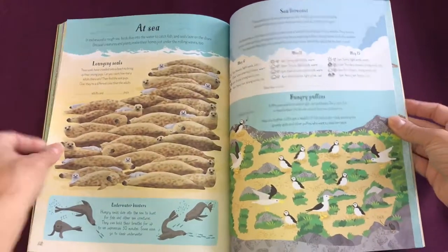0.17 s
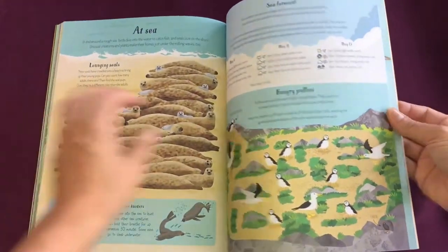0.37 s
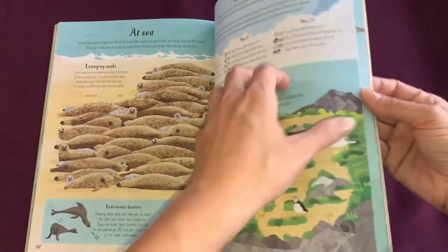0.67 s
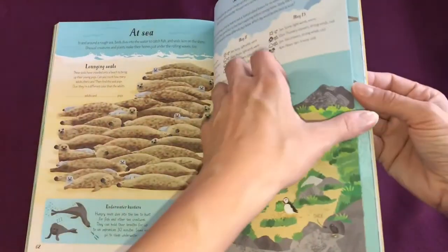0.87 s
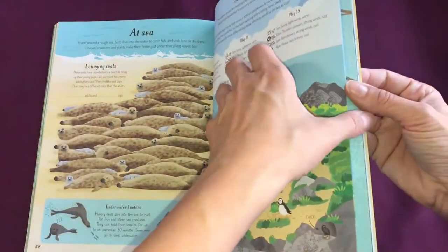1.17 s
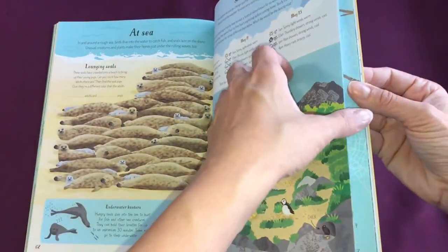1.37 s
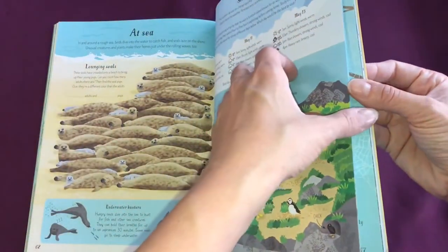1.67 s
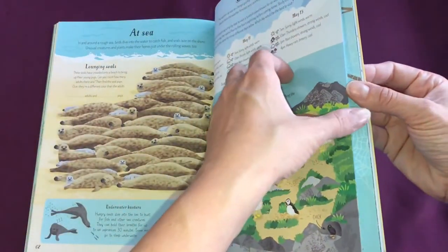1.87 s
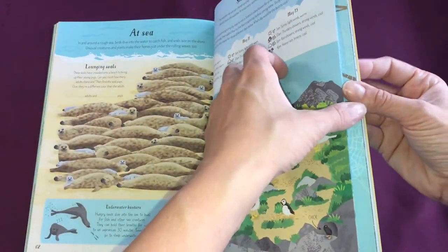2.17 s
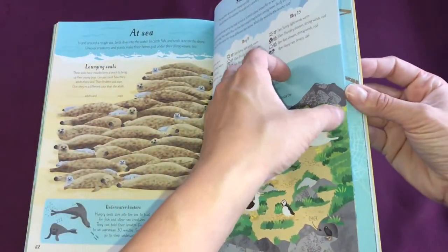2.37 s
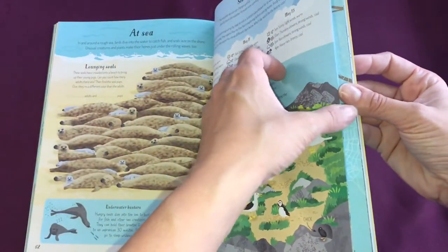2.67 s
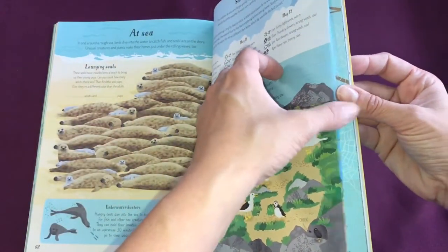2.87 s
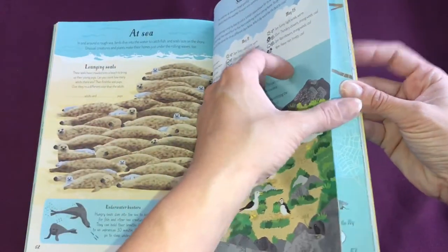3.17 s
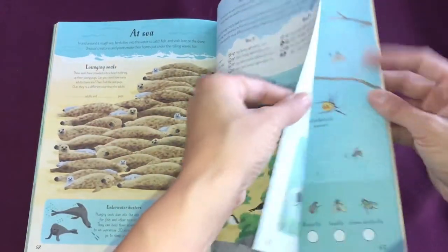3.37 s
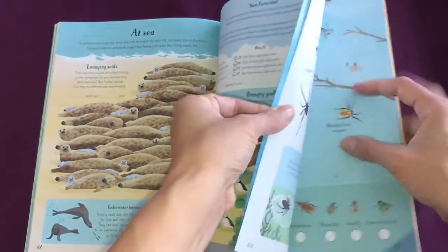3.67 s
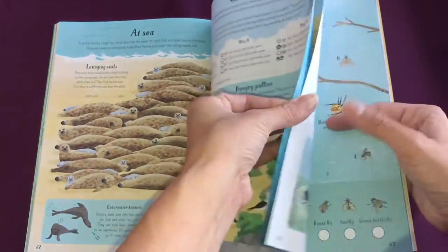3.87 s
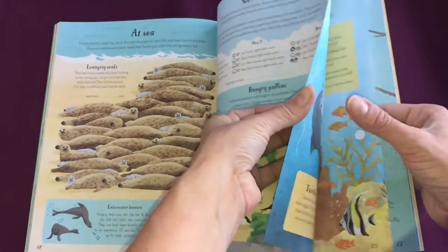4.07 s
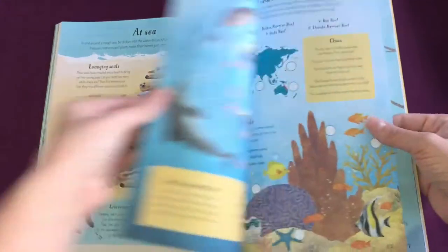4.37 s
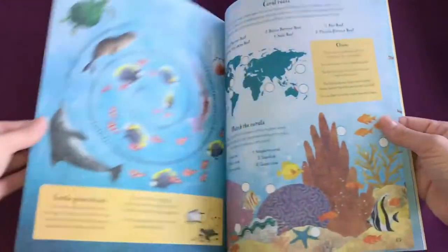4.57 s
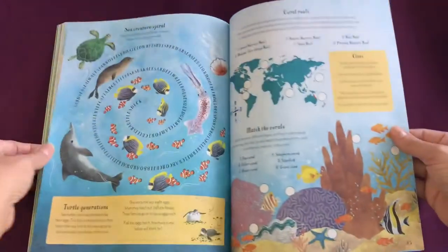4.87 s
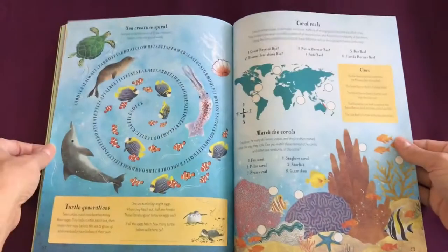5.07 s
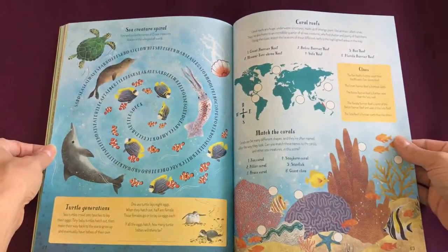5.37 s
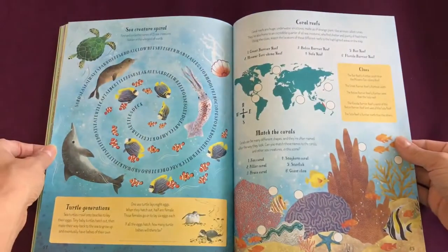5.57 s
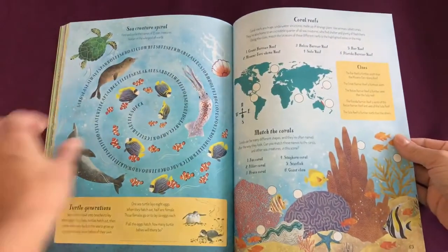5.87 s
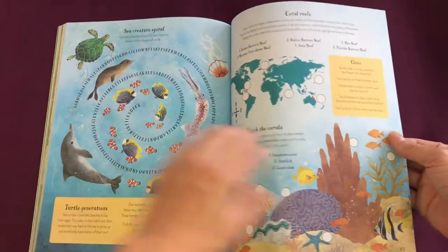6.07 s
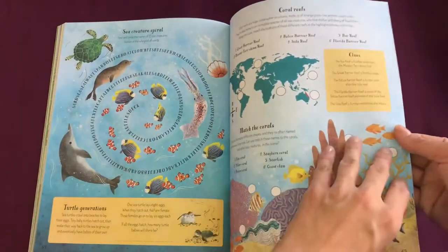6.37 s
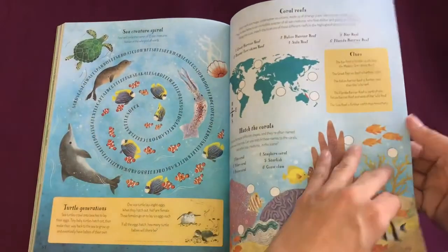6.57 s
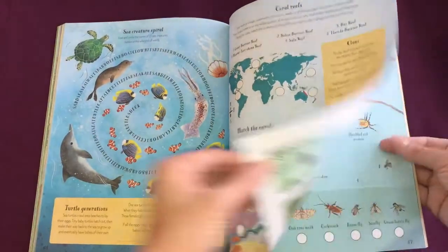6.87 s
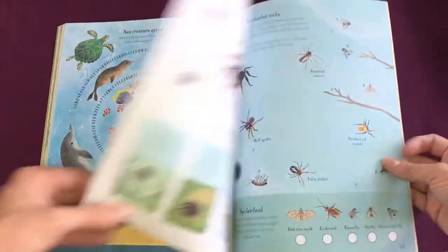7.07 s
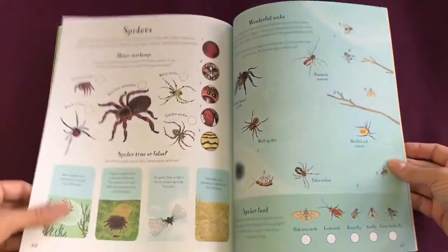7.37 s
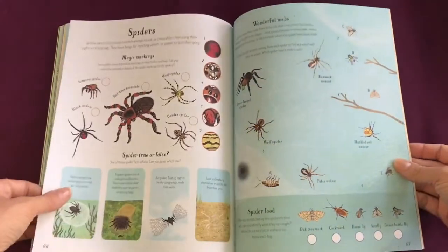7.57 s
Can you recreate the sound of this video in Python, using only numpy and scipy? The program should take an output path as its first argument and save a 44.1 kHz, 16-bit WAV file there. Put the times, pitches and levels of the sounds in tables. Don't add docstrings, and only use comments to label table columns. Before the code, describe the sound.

A close, mostly dry indoor sound of a glossy book being handled, over a steady faint low hum of household appliances, soft air noise and barely audible thin treble ticks about ten times a second. In the first 0.7 seconds, a small flick and light finger rubs and rustles. Near-silence follows, with tiny ticks around 1.2 and a snap at 1.8. Sharp edge snaps and a quick rub come at 2.2-2.4, softer rubbing at 2.6-2.9. From 3.2 to 4.9 the busiest passage: rustling, sliding sheets, hollow low pops, bright cracks and brief breathy squeaks of squeezed air as pages turn, then fading. Quiet around 5-5.8, with small ticks and a faint distant thud at 5.6. From 5.8 light rustles grow into a second, gentler turn at 6.6-7.5, with snaps near 6.9, a dull flap at 7.2, then tiny final rubs.

```python
import sys
import numpy as np
from scipy import signal
from scipy.fft import rfft, irfft
from scipy.io import wavfile

SR = 44100
rng = np.random.default_rng(int(sys.argv[2]) if len(sys.argv) > 2 else 0)


def elevation(decibels):
    levels = np.asarray(decibels, float)
    return 10 ** (levels / 20)


def materialize(psi):
    bounded = np.clip(np.atleast_2d(psi).T, -1, 1)
    quanta = np.round(bounded * 32767).astype(np.int16)
    wavfile.write(sys.argv[1], SR, quanta)


N = 340893


def rms_one(x):
    return x / np.sqrt(np.mean(x ** 2) + 1e-20)


def colour(x, points):
    hz, level_db = np.transpose(points)
    grid = rfft(np.zeros(N)).size
    at = np.log(np.linspace(1, SR / 2, grid))
    gain_db = np.interp(at, np.log(hz), level_db, left=-90)
    return irfft(rfft(x) * elevation(gain_db), N)


def band(x, low_hz, high_hz):
    edges = [low_hz, min(high_hz, 0.45 * SR)]
    return signal.sosfilt(signal.butter(4, edges, "band", fs=SR, output="sos"), x)


def resonance(x, hz, width_hz):
    r = np.exp(-np.pi * width_hz / SR)
    ring = [1, -2 * r * np.cos(2 * np.pi * hz / SR), r * r]
    return signal.lfilter([(1 - r * r) / 2, 0, (r * r - 1) / 2], ring, x)


def drift(rate):
    r = np.exp(-80 * np.pi * rate / SR)
    noise = rng.standard_normal(N // 40 + 2002)
    slow = signal.lfilter([1], [1, -2 * r, r * r], noise)[2000:]
    return np.interp(np.arange(N) / 40, np.arange(len(slow)), rms_one(slow - slow.mean()))


def sliding():
    # (f/Hz, level/dB)
    sheet_colour = [(250, -18), (400, 5), (800, 3.5), (1600, 0), (2300, -1), (2800, -4), (4200, -4.5),
                    (5000, -8), (7000, -6.5), (10000, -10), (10600, -16.5), (12500, -14.5), (15800, -18)]
    grain_size = elevation(2.4 * np.minimum(rng.exponential(1, N), 5))
    grain_here = rng.random(N) < 2500 / SR
    grains = grain_size * grain_here * rng.choice([-1, 1], N)
    sheet = colour(rng.standard_normal(N) + 0.77 * rms_one(grains), sheet_colour)
    ranges_hz = [(2450, 4850), (350, 2200), (5000, 10300), (10600, 17500)]
    pressure = elevation(1.33 * drift(32.0) - 3.0)
    out = np.zeros(N)
    for gain, (low_hz, high_hz) in zip(strokes(), ranges_hz):
        out += gain * pressure * rms_one(band(sheet, low_hz, high_hz))
    return out


def strokes():
    # (start/s, end/s, level/dB, pressure change/dB, brightness/dB)
    rubs = [(.25, .254, -63, 0, 0), (.265, 0.267, -64, 0, 0), (0.28, 0.282, -62, 0, 0),
            (0.296, .3, -61, -2, 0), (0.309, 0.313, -60, 0, 5), (0.317, 0.332, -53, -10, 10),
            (.35, .455, -61, -6.5, 6), (1.15, 1.23, -75, 7, 13), (1.229, 1.29, -60.5, 11, 4.5),
            (2.196, 2.28, -63, -27, -2), (2.287, 2.294, -64, 0, -2), (2.295, 2.417, -49, -27, 2),
            (2.622, 2.7, -61, -7, -3), (2.712, 2.791, -52.5, 2, -10), (2.795, 2.86, -52.5, -28, -1),
            (4.074, 4.155, -63, -1, 10), (4.335, 4.383, -61.5, 9, 1), (4.385, 4.448, -53, 2.5, 0),
            (4.45, 4.514, -54, -6, -1), (6.9, 6.945, -54.5, -6, -4), (7.097, 7.22, -59, -1, 10),
            (4.53, 4.617, -68, -7, -1), (4.72, 4.77, -69, -10, 4), (4.882, 5.096, -61.5, -18, 10),
            (7.486, 7.514, -61, 0.5, 5)]
    # (start/s, end/s, level/dB, pressure
    # change/dB, brightness/dB)
    slides = [(0.184, 0.228, -59, 0.5, 1.5), (.239, 0.31, -74, 0, -6), (0.619, .72, -56, -14, 2.5),
              (.96, 1.1, -79, 2, -6), (1.817, 1.896, -60.5, -19, 0), (3.084, 3.2, -76, 2, 2),
              (3.2, 3.265, -73, 13.5, 8), (3.322, 3.432, -57, 7.5, -4),
              (3.448, 3.542, -59.5, 5.5, -5), (3.548, 3.643, -59, -9, 0), (3.648, 3.662, -63, 6, 10),
              (3.666, 3.687, -54, -1, 12.5), (3.7, 3.72, -62, -2, 0), (3.725, 3.734, -46, -1.5, 1),
              (3.75, 3.848, -52, -1.5, 1), (3.87, 3.987, -57.5, 6, 4.5), (4.01, 4.046, -47, -2.5, -5),
              (4.159, 4.238, -53, -6, -5.5), (4.25, 4.288, -55, 7, -1.5),
              (4.514, 4.585, -64, 1.5, -2), (4.655, 4.714, -55.5, -5.5, 2),
              (4.38, 4.514, -59.5, 2, -4), (4.825, 4.875, -61.5, 4.5, 0),
              (5.826, 5.86, -64.5, -5, 6), (5.874, 6.09, -69, -8.5, -6),
                     (6.106, 6.15, -67.5, -11, -3), (6.18, 6.212, -75.5, 12.5, -2),
                     (6.242, 6.335, -69, -3, 15.5), (6.347, 6.442, -71, -2, -1),
                     (6.453, 6.521, -61.5, 3, 2), (6.549, 6.721, -61.5, 5.5, 3.5),
                     (6.758, 6.81, -59, 4.5, 0), (6.84, 6.918, -58.5, 2, 4.5),
                     (6.932, 7.017, -58, 6.5, -4.5), (7.028, 7.088, -56.5, -7, 3.5),
                     (7.213, 7.267, -63, -4.5, 7), (7.331, 7.34, -57.5, -6, -2),
                     (7.367, 7.463, -60.5, -10, 6), (7.535, 7.576, -67, -3.5, 0), (7.443, 7.503, -67, 2, 1),
                     (7.667, 7.717, -65, -4, 0.5)]
    # (start/s, end/s, level/dB, pressure change/dB, brightness/dB)
    bends = [(0, 0.01, -67, -16, 0), (.24, 0.448, -71.5, 0, -8), (1.817, 1.88, -59.5, -9, -8),
             (3.27, 3.304, -48, -7, 7), (3.306, 3.593, -56, -3, -3), (3.754, 3.802, -51.5, -1, 6),
             (3.81, 3.834, -52, -4, 6), (3.842, 3.87, -49.5, -6, 8), (3.883, 4.026, -55.5, 6, 1),
             (4.016, 4.036, -53, -3, 0), (4.066, 4.076, -49.5, -1, -6), (4.058, 4.166, -52, -8, 1),
             (4.193, 4.266, -56, -2, -6), (4.326, 4.576, -56, -0.5, -1), (4.592, 4.645, -53, -2, -6),
             (4.688, 4.79, -51, -17, 4), (4.8, 4.91, -57.5, -1.5, 0), (4.917, 5.302, -60, -14, -11),
             (5.4, 5.6, -66.5, -10, -10), (5.83, 6.0, -66.5, -6, -6), (6.626, 6.705, -63, 0, -8),
             (6.947, 7.07, -63.5, -1, -8), (7.09, 7.23, -64.5, 1, -8), (7.232, 7.323, -55.5, -16, 0),
             (7.345, 7.416, -58, -9, -3)]
    holding_db = np.array([-87.5, -76, -85, -85.5])
    bright_share = np.array([0.043, 0, 0.6, 0.86])
    # (strokes, level of each range/dB, start steepness/(dB per s), end steepness/(dB per s))
    kinds = [(rubs, (-0.5, -23, -12, -19.5), 2600, 1800),
             (slides, (-0.5, -6.5, -3.5, -8), 1300, 747),
             (bends, (-11.5, -0.5, -14, -23), 1300, 748)]
    t = np.arange(0, N + 64, 64) / SR
    power = elevation(holding_db)[:, None] ** 2 + 0 * t
    for rows, mix_db, touch, lift in kinds:
        for start, end, level_db, change_db, bright_db in rows:
            held = level_db + change_db * np.clip((t - start) / (end - start), 0, 1)
            shape = held - touch * np.maximum(start - t, 0) - lift * np.maximum(t - end, 0)
            range_db = np.array(mix_db) + bright_db * bright_share
            power += elevation(shape + range_db[:, None]) ** 2
    return [np.interp(np.arange(N) / SR, t, gain) for gain in np.sqrt(power)]


def page_acoustics(x):
    # (t/s, strength 0-1)
    book_echo = [(0, 0), (.3, 0.33), (.6, 0.24), (1.25, 0.6), (1.7, 0.1), (1.95, 0.2), (2.3, 0.73),
                 (2.75, 0.43), (3.2, 0.27), (4.0, 0.06), (4.4, 0.12), (4.9, 0.22), (6.2, 0.26), (6.5, 0),
                 (6.9, 0.32), (7.3, 0.1), (7.73, 0.1)]
    # (start/s, end/s, f/Hz, level/dB)
    pockets = [(0.184, 0.237, 6660, 6), (0.285, 0.48, 1270, 9), (0.29, .47, 4550, 6.5),
               (0.605, .66, 850, 13), (1.6, 2.393, 4160, 6.5), (2.605, 2.695, 4100, 11),
               (2.7, 2.84, 3300, 2), (3.647, 3.702, 1680, 18.5), (3.85, 4.05, 2100, 5.5),
               (3.64, 3.71, 4800, 9.5), (4.36, 4.51, 1010, 5), (3.74, 3.95, 340, 11.5),
               (4.36, 4.47, 4100, 6), (4.66, 4.74, 440, 11.5), (.26, .47, 2370, -20),
               (4.645, 4.73, 8100, 10), (6.75, 6.828, 1760, 10.5), (6.815, 6.946, 1500, 14),
               (4.1, 4.48, 610, -8), (6.938, 7.07, 1620, 5), (7.08, 7.3, 1630, 7), (3.3, 3.72, 640, -8),
               (6.9, 6.6, 800, -8), (6.955, 7.05, 5340, 9), (7.09, 7.186, 6950, 12), (7.205, 6.3, 8100, 6),
               (7.24, 7.463, 1070, 10.5), (2.71, 2.77, 1800, 7.5), (7.08, 6.5, 4100, 7),
               (6.74, 7.26, 2120, 7.5), (3.6, 3.76, 1030, 6.5), (1.2, 1.3, 2200, -10),
               (4.415, 4.455, 680, -12), (3.76, 3.775, 5300, 9), (3.72, 3.74, 5400, 7), (2.7, 2.6, 4240, 5),
               (3.5, 3.6, 840, 5)]
    book_delay_s, page_delay_s, page_share = 0.0003994, 0.001052, 0.34
    at = np.arange(N)
    strength = np.clip(np.interp(at / SR, *np.transpose(book_echo)), 0, 0.95)
    echo = np.interp(at - book_delay_s * SR, at, x)
    out = (x - strength * echo) / np.sqrt(1 + strength ** 2)
    gap = page_delay_s * SR * elevation(3.22 * drift(2.146))
    out = out + page_share * np.interp(at - gap, at, out)
    for start, end, hz, gain_db in pockets:
        width_hz = 220 * (hz / 1000) ** 0.54
        span = slice(round(start * SR), round(end * SR))
        part = out[span]
        fade = signal.windows.tukey(len(part), 0.3)
        out[span] = part + (elevation(gain_db) - 1) * fade * resonance(part, hz, width_hz)
    return out


def snaps():
    # (t/s, ring peak/dB, flap/dB, crack/dB)
    flicks = [(0.174, -42.5, -60, -56.5), (2.2365, -36.5, -54, -60), (2.2624, -36.5, -53, -57),
              (2.8886, -52, -78, -63), (2.9217, -45.5, -75, -55.5), (3.3546, -35.5, -46, -69),
              (3.475, -47, -51, -51.5), (4.0108, -35, -41, -39.5), (4.2452, -47, -51, -45),
              (4.3116, -47, -48, -64), (5.413, -52, -52.5, -58.5), (5.458, -49.5, -53, -62),
              (5.8217, -47.5, -63, -62), (6.6343, -40.5, -72, -57), (6.8362, -44, -46, -49),
              (6.9007, -44, -47, -50)]
    # (t/s, ring peak/dB, flap/dB, crack/dB)
    ticks = [(1.15, -58, -70, -75), (1.169, -56, -72, -75), (1.2907, -54, -68, -53), (1.804, -58, -68, -56),
             (1.8138, -37.5, -46, -51), (2.196, -54, -70, -75), (2.206, -52, -72, -75),
             (2.288, -54, -70, -72), (2.297, -30.5, -51, -48), (3.6157, -56, -63, -65),
             (3.485, -52, -51, -64), (4.057, -29.5, -43, -54), (4.379, -56, -56, -70), (4.4, -52, -52, -72),
             (7.369, -50, -54, -62), (7.379, -56, -56, -66)]
    # (t/s, ring peak/dB, flap f/Hz, flap/dB, crack/dB)
    pops = [(0.3092, -61, 1310, -62, -68), (0.6125, -62, 929, -60, -64), (3.269, -35, 1040, -36, -62),
            (3.7292, -46, 1600, -39, -47), (3.7606, -39, 870, -37, -49), (3.7802, -38, 850, -36.5, -54),
            (3.8064, -37, 845, -34, -48), (3.8378, -45, 805, -32.5, -45), (3.9338, -35, 870, -33, -55),
            (3.9535, -52, 1900, -40, -57), (4.0728, -60, 1050, -37, -66), (4.3294, -61, 1030, -55, -74),
            (4.4985, -50, 1000, -45.5, -58), (4.5922, -58, 870, -38, -74), (4.0127, -50, 2500, -34, -55),
            (6.3976, -56, 767, -64, -80), (7.2336, -48, 1120, -29.5, -75)]
    flick_hz, jolt_s = 1620, 0.0006
    events = [(*pop, 0.0069) for pop in pops]
    for rows, tear_s in [(flicks, 0.0086), (ticks, 0.0012)]:
        for s, ring_db, flap_db, crack_db in rows:
            events.append((s, ring_db, flick_hz, flap_db, crack_db, tear_s))
    out, size = np.zeros(N), 2600
    t = np.arange(size) / SR
    swell = t / (jolt_s * np.array([[1], [1.6], [1]]))
    jolt = swell * np.exp(1 - swell)
    fading = np.exp(-t * [[30], [60], [150]])
    for s, ring_db, flap_hz, flap_db, crack_db, tear_s in events:
        tear = 1 / (1 + np.exp((t - tear_s) / 0.00036))
        share = min(1, elevation(-0.5 * ring_db - 28.0))
        release = rng.standard_normal((3, size)) * (jolt + share * tear * fading)
        release[::2, 20] += np.array([2.1, 4.7]) * np.sqrt(jolt_s * SR)
        ring = band(release[0], 2690, 4500)
        crack = band(release[1], 3660, 17250)
        flap = resonance(release[2], flap_hz, 0.25 * flap_hz)
        flap -= 0.12 * resonance(release[2], 2 * flap_hz, 310)
        flap += 0.18 * band(release[2], 440, 2550)
        flap = band(flap, 513, 3.1 * flap_hz)
        at = round(s * SR)
        for part, peak_db in [(ring, ring_db), (flap, flap_db + 4.5), (crack, crack_db + 9.5)]:
            out[at:at + size] += elevation(peak_db) * part / np.abs(part).max()
    return out


def slits():
    # (start/s, end/s, from f/Hz, to f/Hz, level/dB)
    singing = [(1.202, 1.293, 4100, 3200, -69), (2.3, 2.36, 4200, 3980, -63),
               (3.66, 3.684, 3630, 3520, -49), (3.665, 3.696, 1650, 1597, -50.5),
               (3.66, 3.692, 4600, 4900, -62), (3.389, 3.44, 4120, 4340, -63), (3.395, 3.44, 945, 950, -61),
               (4.377, 4.41, 880, 1000, -57), (4.416, 4.467, 1065, 1053, -55),
               (4.474, 4.501, 1094, 980, -57), (4.54, 4.6, 4100, 4000, -66), (6.76, 6.81, 4470, 4100, -63),
               (6.835, 6.934, 1910, 1510, -63), (6.84, 6.932, 6340, 6300, -65),
               (6.895, 6.958, 3810, 3600, -60), (6.967, 7.05, 5180, 5350, -61),
               (6.98, 7.048, 3700, 4100, -63), (7.1, 7.16, 7060, 7150, -60.5),
               (7.086, 7.211, 3810, 4180, -61.5), (7.09, 7.182, 2750, 2400, -64),
               (7.193, 7.226, 2920, 2900, -65), (7.236, 7.252, 850, 780, -52),
               (0.186, 0.23, 3500, 3600, -64), (0.614, 0.645, 3510, 3500, -62.5),
               (0.72, 0.8, 7000, 6950, -78), (3.268, 3.28, 1000, 830, -49), (7.328, 7.346, 2600, 2600, -63),
               (7.372, 7.425, 3900, 3800, -68)]
    out = np.zeros(N)
    for start, end, from_hz, to_hz, level_db in singing:
        length = min(round((end - start) * SR), 7000)
        width_hz = 70 * (from_hz / 1000) ** 0.98
        r = np.exp(-np.pi * width_hz / SR)
        slow = signal.lfilter([1], [1, -2 * r, r * r], rng.standard_normal((2, 8000)))
        a, b = rms_one(slow[:, 1000:1000 + length])
        phase = 2 * np.pi * np.cumsum(np.linspace(from_hz, to_hz, length)) / SR
        whistle = a * np.cos(phase) + b * np.sin(phase)
        at = round(start * SR)
        out[at:at + length] += elevation(level_db) * signal.windows.tukey(length, 0.4) * whistle
    return out


def room(x):
    t60_s, level_db = 0.45, -19.5
    t = np.arange(SR // 2) / SR
    tail = rng.standard_normal(len(t)) * elevation(-60 * t / t60_s) * (t > 0.002)
    tail = band(tail, 330, 3900)
    return elevation(level_db) * signal.fftconvolve(x, tail / np.sqrt(np.sum(tail ** 2)))[:N]


def thud():
    hz, level_db, length_s = 68, -51.5, 0.022
    t = np.arange(N) / SR - 5.63
    return elevation(level_db) * np.exp(-0.5 * (t / length_s) ** 2) * np.sin(2 * np.pi * hz * t)


def hum():
    # (multiple, level/dB)
    mains = [(2, -46.5), (3, -75), (6, -82.5)]
    # (multiple, level/dB)
    fan = [(4, -68), (7, -73.5), (8, -65), (9, -77.5), (10, -69), (16, -93)]
    # (multiple, level/dB)
    fan_sidebands = [(3, -95), (4, -75), (5, -68.5), (6, -72.5), (8, -78), (9, -74.5)]
    # (multiple, level/dB)
    compressor = [(1, -73), (4, -81), (5, -69), (6, -76), (8, -78), (9, -82.5), (14, -93.5), (18, -88),
                  (25, -88.5), (27, -91.5), (32, -85), (44, -93.5)]
    # (multiple, level/dB)
    pump = [(1, -61.5), (2, -67), (4, -71)]
    mains_hz, fan_hz = 59.965, 32.33
    # (tones, base f/Hz, shift/Hz, level sway/dB)
    families = [(mains, mains_hz, 0, 0.2), (fan, fan_hz, 0, 1.2),
                (fan_sidebands, fan_hz, 2 * mains_hz, 1.2),
                (compressor, 58.82, 0, 1.2), (pump, 92.4, 0, 1.2)]
    t, out = np.arange(N) / SR, np.zeros(N)
    for tones, base_hz, shift_hz, sway_db in families:
        for multiple, level_db in tones:
            hz = round(multiple) * base_hz + shift_hz
            level = np.sqrt(2) * elevation(level_db + sway_db * drift(5.0))
            out += level * np.sin(2 * np.pi * (hz * t + rng.random()))
    return out


def room_floor():
    # (f/Hz, level/dB)
    air_colour = [(100, -38), (170, -2), (210, -12), (249, -5.5), (440, -8), (500, -15), (1100, -24),
                  (1700, -30), (2200, -31.5), (4600, -35), (7000, -38.5), (10500, -46.5), (12000, -39.5),
                  (15500, -46.5)]
    # (f/Hz, level/dB)
    rumble_colour = [(20, -17), (30, -8), (55, -5), (72, 4.5), (82, -6), (100, 5), (145, -14.5), (175, 2),
                     (200, 7.5)]
    # (f/Hz, width/Hz, level/dB)
    whines = [(1923, 60, -90), (4940, 30, -88.5)]
    air, low, motor = rng.standard_normal((3, N))
    out = elevation(-61) * rms_one(colour(air, air_colour))
    rumble = rms_one(colour(low, rumble_colour + [(215, -38.5)]))
    out += elevation(-64.5 + 2.25 * drift(1.8)) * rumble
    for hz, width_hz, level_db in whines:
        whine = resonance(resonance(motor, hz, width_hz), hz, width_hz)
        out += elevation(level_db) * rms_one(whine)
    return out


def beacon():
    start_s, period_s, level_db = 0.0069, 0.1024, -51.5
    at = (np.arange(start_s, N / SR - 0.01, period_s) * SR).astype(int)
    clicks = np.full(N, 1e-18)
    clicks[at] = elevation(level_db + rng.normal(0, 1.0, len(at)))
    return band(clicks, 9500, 17000)


def scene():
    cracks = snaps()
    rustle = page_acoustics(sliding())
    paper = cracks + rustle + slits() + room(cracks + 0.78 * rustle)
    background = thud() + hum() + room_floor() + beacon()
    return (paper + background)[None]


def low_pass(x):
    return signal.sosfilt(signal.butter(12, 16480, fs=SR, output="sos"), x)


def record(dry):
    cut = signal.sosfilt(signal.ellip(12, 0.3, 70, 15780, fs=SR, output="sos"), dry)
    return low_pass(cut)


dry = scene()
out = record(dry)
materialize(out)
```